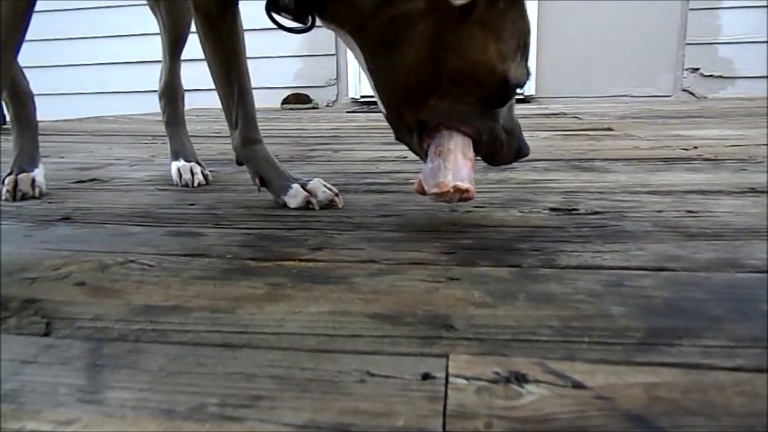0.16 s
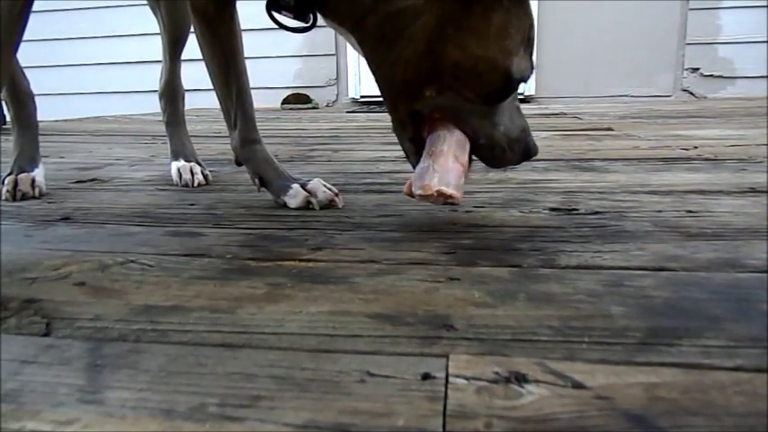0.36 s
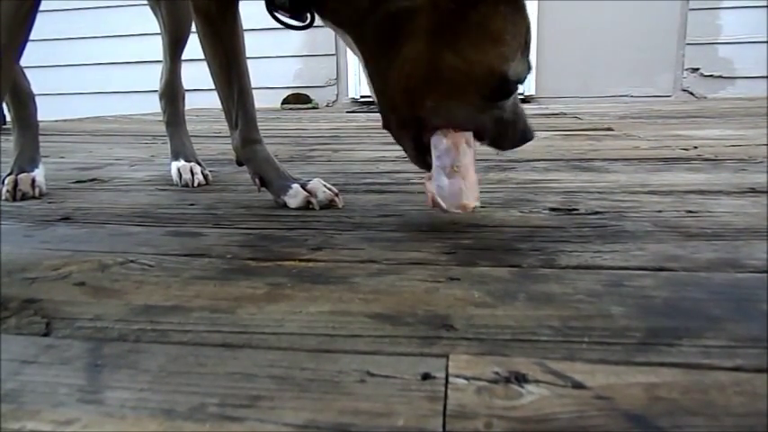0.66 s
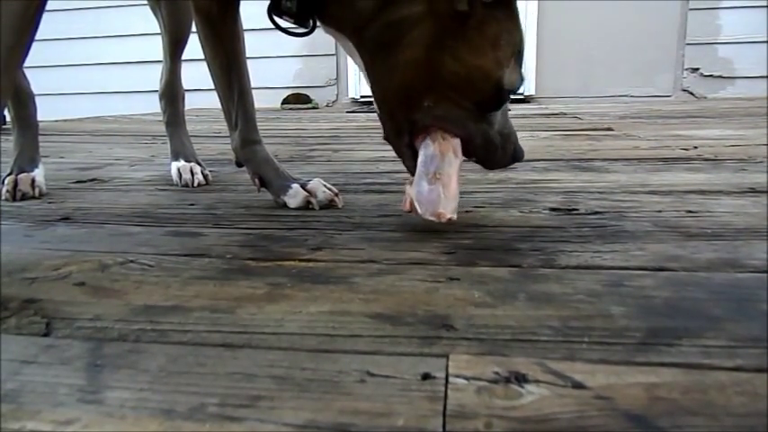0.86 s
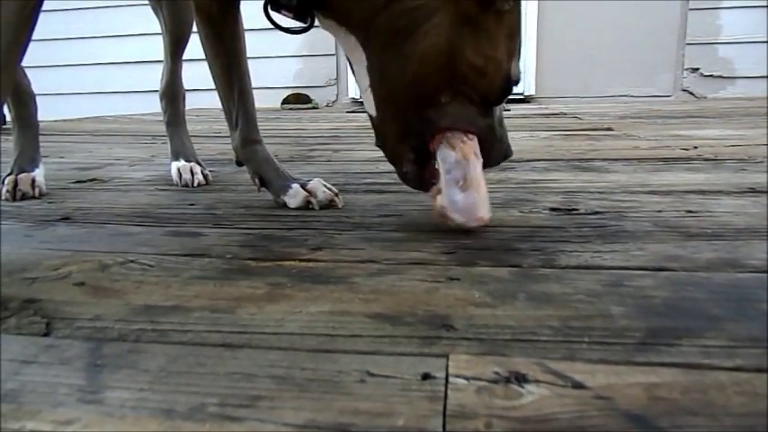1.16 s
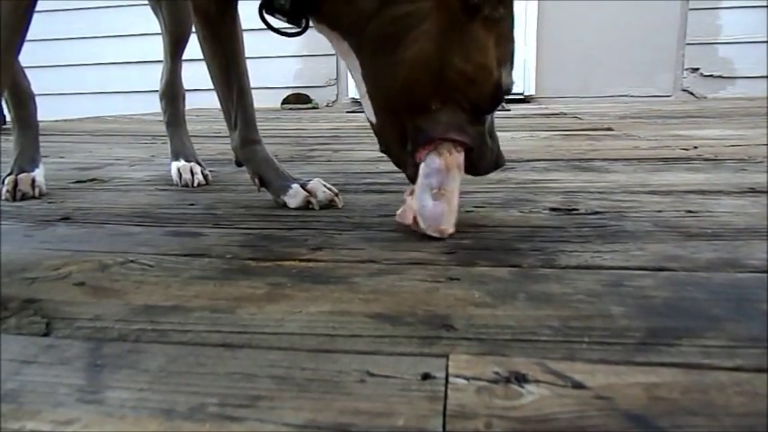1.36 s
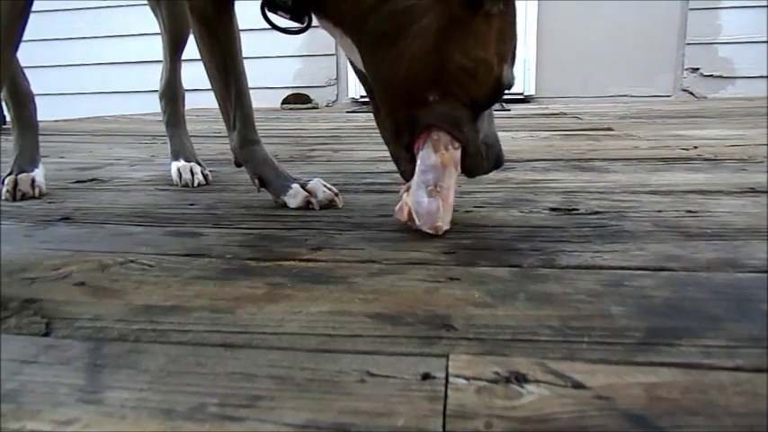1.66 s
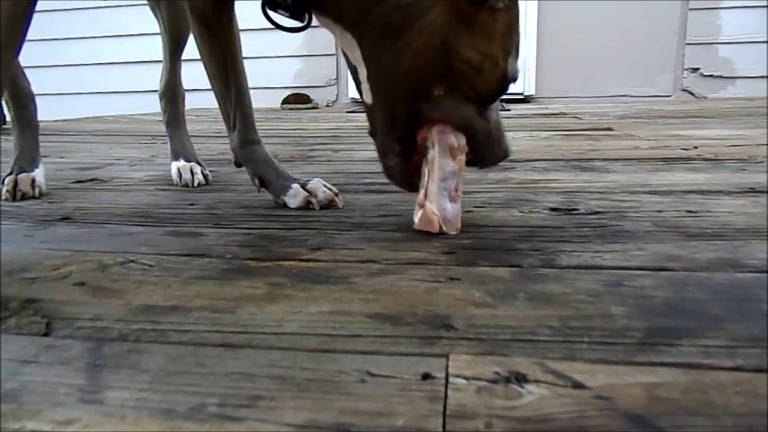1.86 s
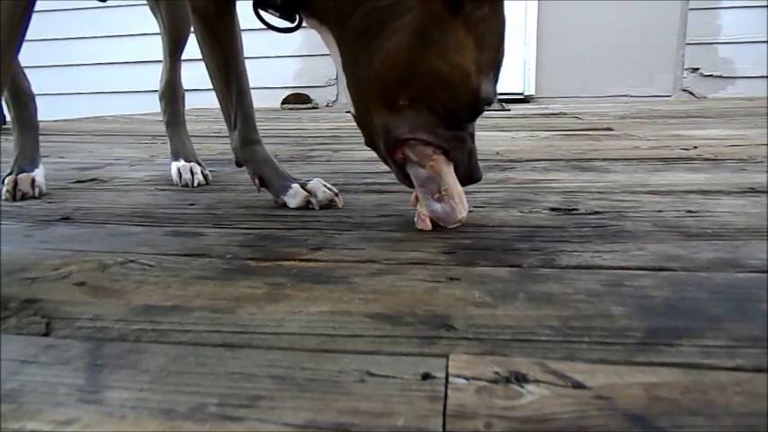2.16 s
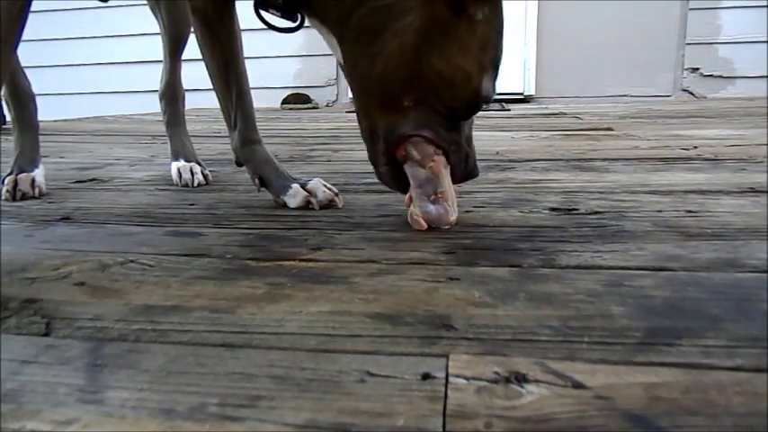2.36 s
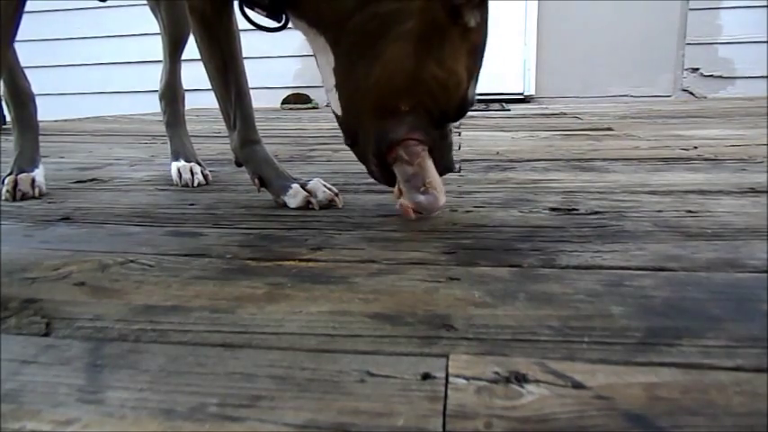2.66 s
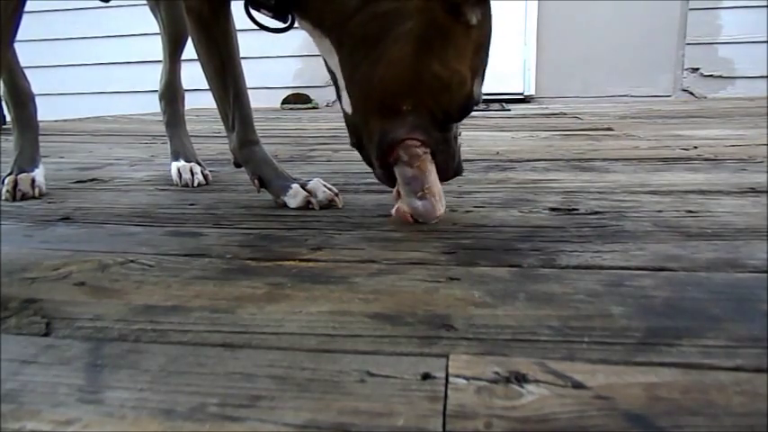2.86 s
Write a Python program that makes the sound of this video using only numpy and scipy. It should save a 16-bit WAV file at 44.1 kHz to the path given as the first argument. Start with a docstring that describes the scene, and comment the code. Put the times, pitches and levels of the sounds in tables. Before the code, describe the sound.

A dog crunches a raw bone close to a stereo microphone outdoors. Small crackles lead to a hard splintering crack at 0.2 s, another at 0.27, then a strong one at 0.85. Knocking cracks come at 1.3 to 1.36, and a crunch with grinding runs 1.47 to 1.65. Later crackles are faint. Wet hiss and soft hum continue; wind thumps the right side near 1.1 and heavily from 1.9 s.

```python
"""On a wooden deck, a dog cracks a raw bone between its teeth, close to two microphone ports.
Each crack is a short noise burst that rings the jaw and bone and splinters in the treble.
Pitched grains grind between cracks; echoes and a sparse tail are the deck and yard answering.
Gusts thump the right port with low pulses, over shaped-noise outdoor hum and a wet chewing hiss."""
import sys
import numpy as np
from scipy import signal
from scipy.fft import rfft, irfft
from scipy.io import wavfile
from scipy.ndimage import uniform_filter1d

SR = 44100
rng = np.random.default_rng(int(sys.argv[2]) if len(sys.argv) > 2 else 0)


def generate_wav(signal):
    """Clip the signal to [-1, 1] and save it as 16-bit WAV at the path in sys.argv[1]."""
    frames = np.transpose(np.atleast_2d(signal))
    scaled = np.clip(frames, -1, 1) * 32767
    pcm = np.round(scaled).astype(np.int16)
    wavfile.write(sys.argv[1], SR, pcm)


def invert_db(x):
    """Field ratio 10**(x/20) for x, a level in decibels (scalar or array-like)."""
    u = np.asarray(x, float) / 20
    return 10 ** u


N = 132300  # samples, 3 s
LOW_CUT_HZ, BONE_CUT_HZ = 121, 366


def evened(x):
    """Scales to an rms of 1."""
    return x / np.sqrt(np.mean(x ** 2) + 1e-20)


def peaked(x):
    """Scales so that the first channel peaks at 1."""
    return x / (abs(x[0]).max() + 1e-12)


def read(points, hz):
    """Reads a frequency table at any frequency, along a log axis."""
    f, value = np.transpose(points)
    return np.interp(np.log(hz + 1), np.log(f + 1), value)


def curve(points):
    """Draws a level curve in dB through (seconds, dB) points."""
    s, db = np.transpose(points)
    return np.interp(np.arange(N) / SR, s, db)


def add(mix, s, sound):
    """Lays a sound into the mix at s seconds, trimmed at the end."""
    part = mix[..., max(round(s * SR), 0):][..., :sound.shape[-1]]
    part += sound[..., :part.shape[-1]]


def low_cut(x, hz):
    """Third-order high-pass filter."""
    return signal.sosfilt(signal.butter(3, hz, "high", fs=SR, output="sos"), x)


def causal(points, size=1024):
    """Minimum-phase impulse with the given colour, energy 1."""
    log = np.log(invert_db(read(points, abs(np.fft.fftfreq(size, 1 / SR)))))
    taps = np.fft.ifft(np.exp(log - 1j * signal.hilbert(log).imag)).real[:size // 2]
    return taps / np.linalg.norm(taps)


def lag_right(x, samples):
    """Delays the right channel by a fraction of a sample or more: the left port is a little nearer."""
    z = rfft(x[1])
    half_turns = samples * np.arange(len(z)) / (len(z) - 1)
    return np.array([x[0], irfft(z * np.exp(-1j * np.pi * half_turns), x.shape[1])])


def random_hits(per_s, spread_db, most):
    """Single-sample hits at random moments; levels stray from 0 dB by spread_db times a capped draw."""
    size = invert_db(spread_db * np.minimum(rng.exponential(1, N), most))
    return size * (rng.random(N) < per_s / SR)


# Likeness of the two ports in steady noise. Each row: frequency in Hz, left-right correlation from 0 to 1.
PORT_LIKENESS = [(60, 0.28), (130, 0.2), (290, 0.73), (640, 0.74), (1410, 0.44), (3100, 0.27), (6820, 0.12),
                 (15000, 0.02)]


def noise(colour, right, patchy_db):
    """Two-channel noise, partly shared between the ports, with drifting patches in time and frequency."""
    frames, hz = N // 128 + 5, np.fft.rfftfreq(512, 1 / SR)
    a, b, c, d, patches = rng.standard_normal((frames, 257, 5)).T
    patches = uniform_filter1d(patches, size=8, axis=0)
    patches = evened(uniform_filter1d(patches, size=16, axis=1))
    same = np.clip(read(PORT_LIKENESS, hz), -1, 1)[:, None]
    left_z, own_z = a + 1j * b, c + 1j * d
    right_z = same * left_z + np.sqrt(1 - same ** 2) * own_z
    z = np.array([left_z, right_z * invert_db(read(right, hz))[:, None]])
    z = z * invert_db(read(colour, hz)[:, None] + patchy_db * patches)
    return evened(signal.istft(z, nperseg=512, noverlap=384)[1][:, :N])


# Colour of the outdoor hum. Each row: frequency in Hz, relative level in dB per Hz.
HUM_COLOUR = [(24, -62), (40, -40), (105, -32), (181, -8), (248, 5), (393, 3), (1710, -12), (1850, -17.5),
              (6000, -21), (7800, -85), (13200, -120)]
# Right port against left in the hum. Each row: frequency in Hz, level difference in dB.
HUM_RIGHT = [(150, -0.5), (1000, 9), (2500, 0.5)]
HUM_DB, HUM_FOLLOW = -43, 0.43  # mean level; dB of hum swing per dB of hiss swing


def hum():
    """Distant outdoor hum: shaped noise that partly shares the hiss's swells and dips."""
    chew = curve(CHEW_LEVEL)
    return noise(HUM_COLOUR, HUM_RIGHT, patchy_db=3.0) * invert_db(HUM_DB + HUM_FOLLOW * (chew - chew.mean()))


# Pulse width and pitch fall per cycle from the centre; level of the ring after it as an amplitude.
PUFF_CYCLES, PUFF_GLIDE, PUFF_RING = 0.43, -0.092, 0.083


def puff(hz, turn):
    """One pressure thump, 20 ms before and 30 ms after its centre: about one sagging cycle, a short ring."""
    u = np.arange(-882, 1323) / SR * hz  # cycles from the centre
    body = np.exp(-.5 * (u / PUFF_CYCLES) ** 2)
    ring = PUFF_RING * (u > 0) * (1 - np.exp(-u ** 2)) * np.exp(-np.maximum(u, 0) / 5.2)
    sag = .5 * PUFF_GLIDE * np.clip(u, -1.5, 1.5) ** 2
    return (body + ring) * np.cos(2 * np.pi * (u + sag + turn))


BUFFETS_PER_S, BUFFET_DB, BUFFET_SPREAD_DB = 130, 3.5, -2.5  # rate over all pitches; lift; random drop
BUFFET_LOW_HZ, BUFFET_HIGH_HZ = 137, 360
# Buffeting between thumps. Each row: time in seconds, level in dB before BUFFET_DB lifts it.
BUFFET_LEVEL = [(0, -60), (.3, -37), (.36, -18.5), (.42, -48), (.62, -39), (.75, -26.5), (.92, -30.5),
                (1.12, -20.5), (1.17, -41.5), (1.45, -41), (1.65, -33), (1.84, -39), (1.88, -18.5),
                (2.04, -26), (2.1, -24), (2.3, -28), (2.37, -38), (2.46, -15.5), (2.49, -58), (2.55, -34),
                (2.6, -28.5), (2.7, -15.5), (2.76, -26), (2.8, -42), (2.86, -23.5), (3, -27)]


def buffeting():
    """Random small thumps at twelve pitches, swelling and sinking with the gusts."""
    out = np.zeros(N)
    for hz in np.geomspace(BUFFET_LOW_HZ, BUFFET_HIGH_HZ, 12):
        hits = random_hits(BUFFETS_PER_S / 12, BUFFET_SPREAD_DB, 3)
        out += signal.oaconvolve(hits * invert_db(curve(BUFFET_LEVEL) + BUFFET_DB), puff(hz, rng.random()), "same")
    return out


# Gust thumps at the right port, before the low cut.
# Each row: centre in seconds, envelope peak in dB, pitch in Hz.
THUMPS = [(0.3553, -11.5, 263), (0.7836, -19, 216), (0.8845, -17, 257), (0.9034, -18, 249),
          (0.9889, -14.5, 223), (1.053, -10, 243), (1.0962, -10, 289), (1.1139, -15.5, 276),
          (1.1215, -9, 263), (1.8681, -14, 232), (1.8809, -14, 382), (1.8905, -9.5, 274), (1.9069, -5, 345),
          (1.917, -6.5, 360), (1.9257, -11, 243), (1.934, -16, 286), (1.9394, -12.5, 332),
          (1.969, -11, 302), (1.9801, -11.5, 277), (1.9887, -14.5, 202), (2.004, -4, 306),
          (2.013, -15, 240.0), (2.0209, -16, 275), (2.0347, -10.5, 260), (2.1113, -13, 240.0),
          (2.1261, -10.5, 310), (2.184, -6, 323), (2.1914, -5, 362), (2.2196, -16.5, 304),
          (2.2587, -11.5, 243), (2.2675, -21, 224), (2.2721, -1.5, 330), (2.2826, -9.5, 250),
          (2.3312, -9.5, 334), (2.3443, -13, 313), (2.4154, -12, 320), (2.456, -7.5, 244),
          (2.4618, -13.5, 294), (2.58, -12.5, 316), (2.6609, -14, 318), (2.6704, -8.5, 360),
          (2.679, -12.5, 190), (2.694, -15.5, 262), (2.6991, -12.5, 325), (2.7363, -10.5, 300),
          (2.8468, -11.5, 245)]


def thumps():
    """Single gust thumps, each a pressure pulse at a random phase."""
    out = np.zeros(N)
    for s, db, hz in THUMPS:
        add(out, s - 882 / SR, invert_db(db) * puff(hz, rng.random()))
    return out


# Diaphragm snaps in hard gusts, before the low cut. Each row: start in seconds, peak in dB.
SLAPS = [(1.906, -14), (2.001, -7.5), (2.034, -20), (2.454, -11), (2.737, -21)]
# Colour of a snap. Each row: frequency in Hz, relative level in dB.
SLAP_COLOUR = [(200, -27), (600, 18), (1200, 5.5), (2500, 1), (5000, -7), (10000, -33)]
SLAP_S = 0.00013  # decay constant


def slaps():
    """The diaphragm snaps: a tiny roughened pulse through the colour of a snap."""
    out, n = np.zeros(N), np.arange(200)
    for s, db in SLAPS:
        rattle = n * np.exp(-n / SR / SLAP_S) * (0.26 * rng.standard_normal(200) + 1)
        add(out, s, invert_db(db) * peaked(np.convolve(rattle, causal(SLAP_COLOUR))[None])[0])
    return out


def wind():
    """Buffeting, thumps and snaps at the right port; a late trace 41 dB lower at the left."""
    right = low_cut(buffeting() + thumps() + slaps(), LOW_CUT_HZ)
    return np.array([invert_db(-41) * np.roll(right, 300), right])


# Tick rate; floor of the tick levels against the steady hiss, and random rise above it.
CRACKLE_PER_S, CRACKLE_DB, CRACKLE_SPREAD_DB = 596, -15, 4
# Wet chewing hiss. Each row: time in seconds, level in dB before a lift of CHEW_LIFT_DB.
CHEW_LEVEL = [(0, -51.5), (.06, -46.5), (.17, -47), (.3, -52.5), (.4, -51), (.52, -55), (.6, -51),
              (.78, -52), (.95, -50.5), (1.05, -53), (1.25, -54), (1.3, -48.5), (1.42, -49.5),
              (1.56, -45.5), (1.66, -48.5), (1.76, -53.5), (1.87, -53.5), (1.93, -61), (2.07, -64),
              (2.13, -58), (2.28, -53.5), (2.33, -59.5), (2.4, -53), (2.47, -60.5), (2.56, -59),
              (2.66, -50), (2.78, -57), (2.86, -52.5), (3, -52)]
CHEW_LIFT_DB = 5.5
# Colour of the hiss. Each row: frequency in Hz, relative level in dB per Hz.
HISS_COLOUR = [(600, 0), (1200, 0.5), (2500, -1), (5000, -4), (8000, -4.5), (12000, -4), (15500, -7.5),
               (16200, -28)]
# Right port against left in the hiss. Each row: frequency in Hz, level difference in dB.
HISS_RIGHT = [(1000, 2.5), (4000, -0.6), (15000, -5.5)]


def chewing():
    """Wet hiss of meat and saliva: shaped noise swelled by small random ticks that die away by e in 1.5 ms."""
    ticks = invert_db(CRACKLE_DB) * random_hits(CRACKLE_PER_S, CRACKLE_SPREAD_DB, 4)
    grain = 1 + signal.oaconvolve(ticks, np.exp(-np.arange(200) / 66.0))[:N]
    return noise(HISS_COLOUR, HISS_RIGHT, patchy_db=2.5) * grain * invert_db(curve(CHEW_LEVEL) + CHEW_LIFT_DB)


# Deck and wall reflections. Each row: delay in seconds, level in dB against the direct sound.
ECHOES = [(.0072, -24.5), (0.0146, -31.5)]
# Decay of the yard. Each row: frequency in Hz, time to fall 60 dB in seconds.
YARD_DECAY = [(300, 0.029), (1000, 0.096), (4000, 0.11), (15000, 0.095)]
YARD_DB = -16  # tail energy at the left against the direct sound


def yard(x):
    """Two single echoes and a sparse tail of random taps that dies band by band."""
    taps = np.zeros((2, 8820))
    at = np.arange(200, 8800, 20) + rng.integers(0, 20, (2, 430))
    np.put_along_axis(taps, at, rng.choice([-1., 1.], at.shape), 1)
    hz, t, z = signal.stft(taps, SR, nperseg=128)
    fade = invert_db(-60 * t / read(YARD_DECAY, hz)[:, None])
    tail = signal.istft(z * fade, SR, nperseg=128)[1]
    tail = invert_db(YARD_DB) * tail / np.linalg.norm(tail[0])
    for delay, db in ECHOES:
        add(tail, delay, invert_db(db) * np.ones((2, 1)))
    return signal.fftconvolve(x, tail, axes=1)[:, :N]


GRIT_PER_S, GRIT_SPREAD_DB = 1100, 4  # rate over all pitches; random rise
GRIT_LOW_HZ, GRIT_HIGH_HZ, GRIT_CYCLES = 800, 4200, 1.8  # cycles to the peak of a grain
GRIT_TILT_DB, RIGHT_GRIT_DB = -1.5, 1.5  # dB per octave; right against left
# Teeth grinding splinters, left port before the low cut.
# Each row: start in seconds, length in seconds, level in dB.
GRINDS = [(0.043, 0.072, -41.5), (0.215, 0.018, -47), (0.866, 0.017, -31.5), (1.484, 0.024, -32),
          (1.503, 0.11, -40.5), (1.603, 0.049, -32), (2.094, 0.11, -45), (2.25, 0.073, -41.5),
          (2.847, 0.055, -40)]


def grinding():
    """Dense grit of short pitched grains, rising fast and fading through each grind."""
    level, t, grit = np.zeros(N), np.arange(N) / SR, np.zeros(N)
    for s, length, db in GRINDS:
        u = (t - s) / length
        level += invert_db(db) * np.clip(np.minimum(u / 0.082, (1 - u) / .5), 0, 1)
    for hz in np.geomspace(GRIT_LOW_HZ, GRIT_HIGH_HZ, 14):
        hits = random_hits(GRIT_PER_S / 14, GRIT_SPREAD_DB, 3)
        u = t[:600] * hz / GRIT_CYCLES
        grain = u * np.exp(-u) * np.sin(2 * np.pi * hz * t[:600])
        grit += invert_db(GRIT_TILT_DB * np.log2(hz / 1000)) * signal.oaconvolve(hits, grain)[:N]
    return evened(grit) * level * invert_db([[0], [RIGHT_GRIT_DB]])


def mode(t, hz, t60):
    """One resonance: a sine that falls 60 dB in t60 seconds."""
    return invert_db(-60 * t / t60) * np.sin(2 * np.pi * hz * t)


def struck(drive, ringing):
    """The drive sets a resonance ringing, cut to the length of the drive."""
    return signal.fftconvolve(drive, ringing[None], axes=1)[:, :drive.shape[1]]


RING_T60_S, RING_RISE_S, RING_ROUGH = 0.011, 0.00084, .3  # ring decay and rise; share of roughness
RING_AFTER_DB, RING_AFTER_S = -16.5, 0.038  # the skull hums on faintly: level, 60 dB decay


def jaw_ring(drive, hz):
    """The jaw rings at one pitch with a soft start, roughened by the break itself."""
    t = np.arange(drive.shape[1]) / SR
    jaw = mode(t, hz, RING_T60_S)
    skull = invert_db(RING_AFTER_DB) * mode(t, hz, RING_AFTER_S)
    clean = (jaw + skull) * (1 - np.exp(-(t / RING_RISE_S) ** 2))
    ring = peaked(peaked(clean[None]) + RING_ROUGH * peaked(struck(drive[:1], jaw)))
    return ring[[0, 0]]


# Bone modes. Each row: frequency in Hz under a 900 Hz jaw ring, relative level in dB, 60 dB decay in seconds.
BONE_MODES = [(476, -19, 0.017), (1582, -1, 0.0089), (1936, -0.5, 0.0064), (2525, 3, 0.0048),
              (3180, -7.5, 0.0028), (4010, -9, 0.005)]
BONE_FOLLOW = .24  # power by which the modes rise with the jaw ring


def bone_ring(drive, hz):
    """The break strikes the bone modes, which shift with the pitch of the jaw ring."""
    t = np.arange(drive.shape[1]) / SR
    push, bone = drive[:1] + 1.14 * drive, 0
    for f, db, t60 in BONE_MODES:
        bone = bone + invert_db(db) * evened(struck(push, mode(t, f * (hz / 900) ** BONE_FOLLOW, t60)))
    return peaked(bone)


# Colour of the splinter. Each row: frequency in Hz, relative level in dB.
SPLINTER_COLOUR = [(3500, -21.5), (5000, -12), (6300, -5.5), (8000, -0.5), (10000, 1), (12000, -2.5),
                   (15000, 0), (16500, -1.5)]
SPLINTER_S = .0016  # width of the extra push at the start


def splintering(drive):
    """The break, sharper at its start, coloured in the treble and set by its loudest 1.5 ms."""
    t = np.arange(drive.shape[1]) / SR
    snap = drive * (0.87 + np.exp(-(t / SPLINTER_S) ** 2 / 2))
    splinter = struck(snap, causal(SPLINTER_COLOUR))
    return splinter / np.sqrt(uniform_filter1d(splinter[0] ** 2, size=66).max() * 2)


BREAK_S, BREAK_GROWTH_DB = 0.0014, 57  # time scale of a 0 dB crack; dB that about double it
SPLINTER_ALIKE = 1  # left-right likeness of the break
RIGHT_RING_DB, RIGHT_BONE_DB, RIGHT_SPLINTER_DB = 3, .8, -7.5  # right port against left
RING_LAG, BONE_LAG, SPLINTER_LAG = 2.6, 1.62, 0.81  # right port behind left, samples
# Bone cracks, left port before the low cut. Each row: start in seconds, jaw ring level in dB,
# jaw ring pitch in Hz, bone level in dB, splinter level in dB.
CRACKS = [(0.0581, -32, 1140, -17.5, -14), (0.0805, -30, 670, -18, -26), (0.091, -31, 840, -28, -24),
          (0.099, -25.5, 527, -35, -34), (0.1166, -29, 850, -36, -38), (0.1366, -49, 450.0, -28.5, -24.5),
          (0.1767, -22, 1255, -17, -19), (0.1914, -23, 1230, -18, -24), (0.2029, -3.5, 772, 1, 0),
          (0.2043, -5.5, 470, -8.5, -26), (0.2056, -5, 732, -6, -16), (0.2682, -8.5, 1110, -5, -11.5),
          (0.3443, -27, 940, -47, -55), (0.426, -21, 1046, -42, -48), (0.714, -61, 442, -34, -27.5),
          (0.8302, -18.5, 986, -20, -36), (0.8497, -7, 894, -2, -6.5), (0.8508, -9.5, 1550, -4.5, -23),
          (0.8523, -2.5, 902, -7.5, -33), (0.9549, -27.5, 930, -29, -41), (1.31, -11.5, 960, -20.5, -26.5),
          (1.3571, -1.5, 896, -8.5, -18), (1.401, -31, 930, -54, -61), (1.4748, -3, 840, -4, -9),
          (1.4868, -14, 1040, -14, -30), (1.492, -28, 1060, -16.5, -24), (1.5135, -22, 915, -30, -48),
          (1.5246, -23, 815, -26, -42), (1.5437, -26, 785, -20.5, -21), (1.5501, -20.5, 780, -14.5, -19),
          (1.5717, -24, 750, -24.5, -48), (1.6083, -14.5, 590, -6.5, -30), (1.6119, -14, 570, -13.5, -30),
          (1.6155, -12.5, 564, -9.5, -22), (1.627, -13, 546, -14.5, -26), (1.646, -29, 635, -23.5, -30),
          (1.82, -27, 777, -57, -70), (1.95, -27.5, 1016, -54, -42), (2.107, -33, 1040, -33, -40),
          (2.1244, -23, 1040, -45, -37), (2.1418, -23, 866, -22, -34), (2.158, -32, 1340, -32, -50),
          (2.1592, -27, 845, -21.5, -55), (2.242, -29.5, 1130, -42, -52), (2.2857, -22, 674, -43, -39),
          (2.2915, -28.5, 640, -40, -43), (2.5833, -24.5, 566, -28.5, -47),
          (2.8475, -22.5, 686, -21.5, -40), (2.8545, -20, 670, -21, -33), (2.8792, -22.5, 613, -30, -57),
          (2.8919, -27, 520.0, -45, -58)]


def crack(ring_db, hz, bone_db, splinter_db):
    """A short uneven break, longer when stronger, drives the jaw ring, bone modes and treble splinter."""
    grit = rng.standard_normal((2, 2000))
    t = np.arange(2000) / SR
    length = BREAK_S * invert_db(max(ring_db, bone_db) * 6 / BREAK_GROWTH_DB)
    burst = (t / length) ** 0.66 * np.exp(-(t / length) ** 1.054)
    right_grit = SPLINTER_ALIKE * grit[0] + np.sqrt(1 - SPLINTER_ALIKE ** 2) * grit[1]
    drive = np.array([grit[0], right_grit]) * burst
    ring = lag_right(jaw_ring(drive, hz), RING_LAG)
    bone = lag_right(bone_ring(drive, hz), BONE_LAG)
    splinter = lag_right(splintering(drive), SPLINTER_LAG)
    return (ring * invert_db([[ring_db], [ring_db + RIGHT_RING_DB]])
            + bone * invert_db([[bone_db], [bone_db + RIGHT_BONE_DB]])
            + splinter * invert_db([[splinter_db], [splinter_db + RIGHT_SPLINTER_DB]]))


def scene():
    """Cracks and grinding with the answer of the yard, over chewing, hum and wind."""
    bone = grinding()
    for s, *settings in CRACKS:
        add(bone, s, crack(*settings))
    bone = low_cut(bone, BONE_CUT_HZ)
    return bone + yard(bone) + low_cut(chewing() + hum(), LOW_CUT_HZ) + wind()


def top_cut(x):
    """Nothing passes above the cut-off."""
    return signal.sosfilt(signal.butter(12, 16440, fs=SR, output="sos"), x)


CEILING, KNEE, EDGE_HZ = 1.0, 6, 16300  # full-scale limit, firmness of the bend, top of the band


def record(dry):
    """The input overloads with a firm knee, then a steep filter limits the band."""
    held = dry / (1 + abs(dry / CEILING) ** KNEE) ** (1 / KNEE)
    band_limit = signal.firwin(255, EDGE_HZ, window=("kaiser", 9), fs=SR)
    mix = signal.oaconvolve(held, band_limit[None], "same")
    return top_cut(mix)


dry = scene()
out = record(dry)
generate_wav(out)
```